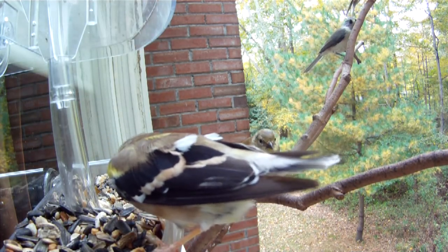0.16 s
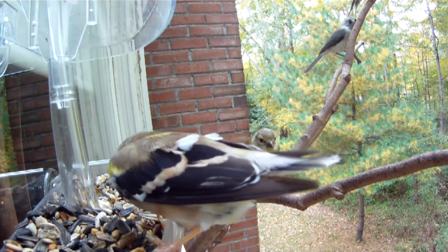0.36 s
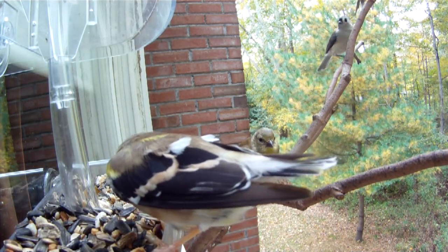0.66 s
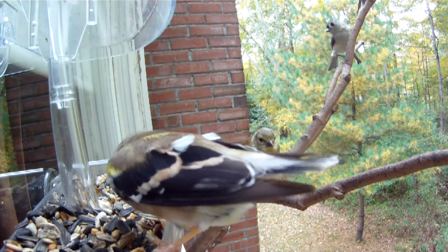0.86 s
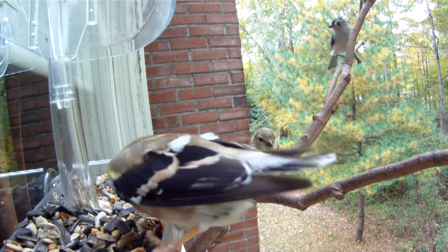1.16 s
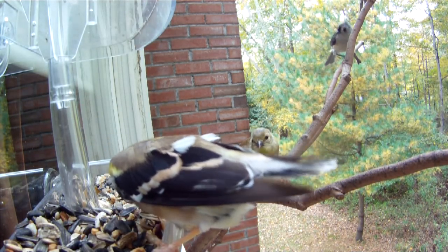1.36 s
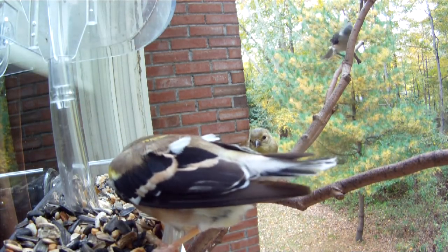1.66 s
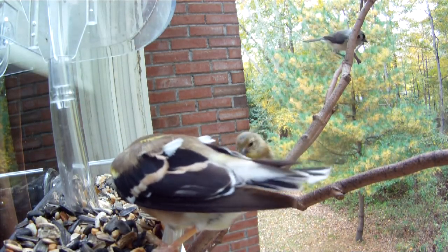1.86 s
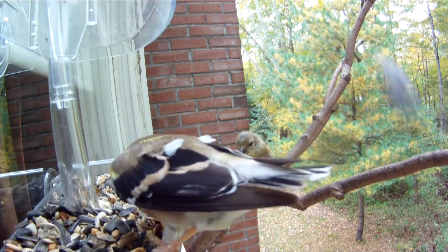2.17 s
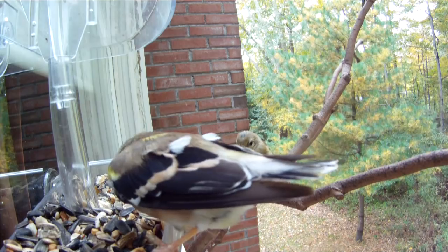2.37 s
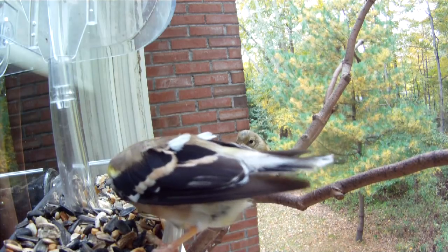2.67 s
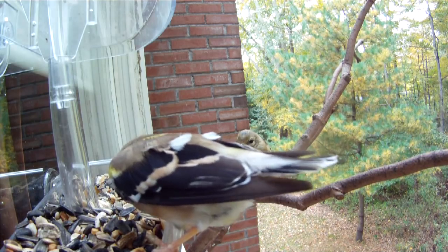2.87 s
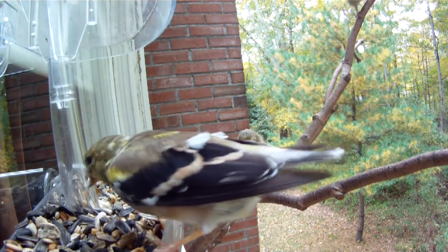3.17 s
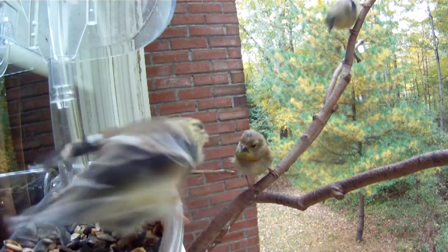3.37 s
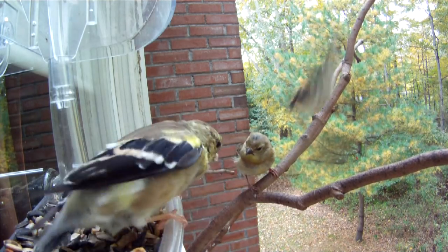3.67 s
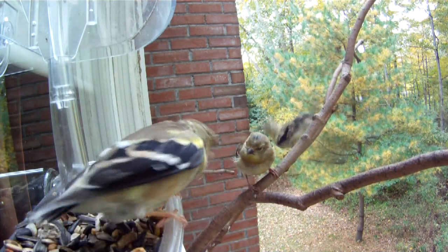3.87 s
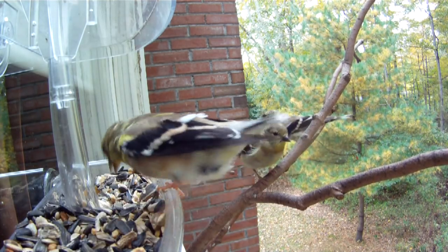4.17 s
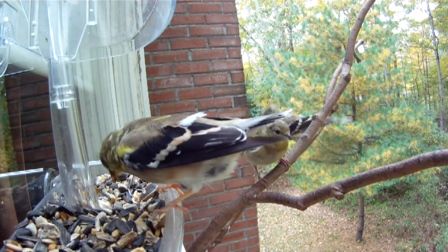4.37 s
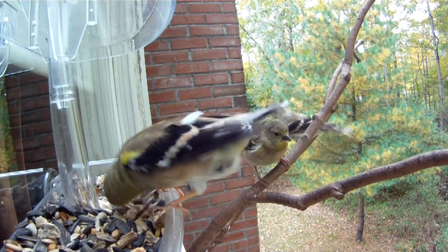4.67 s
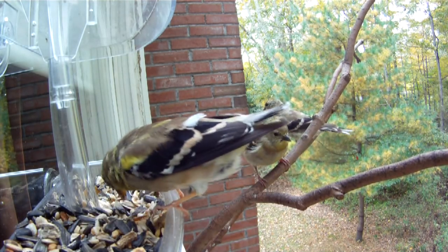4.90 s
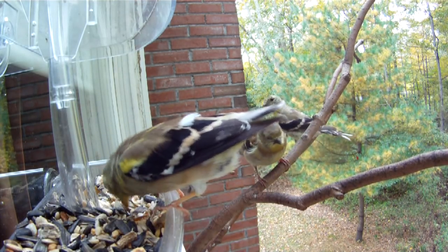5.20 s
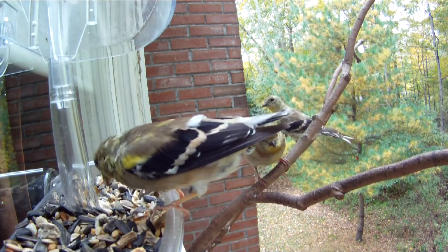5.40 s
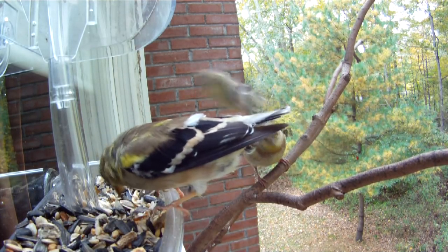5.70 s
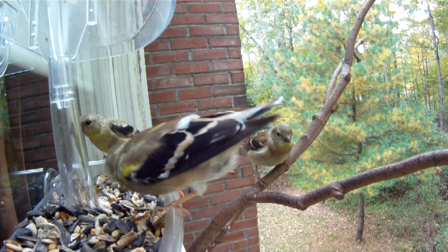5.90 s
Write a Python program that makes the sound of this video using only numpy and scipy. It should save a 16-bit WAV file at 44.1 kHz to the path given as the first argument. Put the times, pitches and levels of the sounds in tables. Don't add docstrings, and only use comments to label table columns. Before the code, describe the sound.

Small songbirds at a plastic seed feeder: soft wing thumps, brief chirps, seed clicks, two sharp tray knocks and a soft landing over constant hiss.

```python
import sys
import numpy as np
from scipy import signal
from scipy.io import wavfile
from scipy.ndimage import uniform_filter1d

SR = 44100
rng = np.random.default_rng(int(sys.argv[2]) if len(sys.argv) > 2 else 0)


def to_linear_factor(level_db):
    exponent = np.asarray(level_db, float) / 20
    return 10 ** exponent


def log_audio(samples):
    frames = np.atleast_2d(samples).T
    limited = np.clip(frames, -1, 1)
    pcm = np.round(limited * 32767).astype(np.int16)
    wavfile.write(sys.argv[1], SR, pcm)


N = 266496


def evened(x):
    return x / np.sqrt(np.mean(x ** 2) + 1e-20)


def peaked(x, db):
    return to_linear_factor(db) * x / abs(x).max()


def add(mix, s, sound):
    part = mix[round(s * SR):][:len(sound)]
    part += sound[:len(part)]


def ring(x, hz, width_hz):
    r = np.exp(-np.pi * width_hz / SR)
    return signal.lfilter([1, 0, -1], [1, -2 * r * np.cos(2 * np.pi * hz / SR), r * r], x)


# f/Hz, density/dB
HISS_SPECTRUM = [(16, -36), (39, -6.5), (69, -2.5), (104, -6.5), (148, -5), (245, -9), (435, -12.5),
                 (735, -15), (1050, -16.5), (1180, -21), (2600, -23), (5050, -26), (5600, -30.5),
                 (6050, -37.5), (7000, -74)]
# t/s, level/dB
STIR = [
    (0.0, -55),
    (1.85, -54),
    (2.35, -52),
    (5.15, -53),
    (5.55, -53),
    (6.04, -52),
]


def hiss(level_db=-47.5, rumble_hz=(95, 210), rustle_hz=500, patchy_db=0.55):
    rumble_share, rustle_share = .45, .95
    frames, hz = N // 1024 + 6, np.fft.rfftfreq(4096, 1 / SR)
    real, imag, patches = rng.standard_normal((frames, len(hz), 3)).T
    f_hz, density_db = np.transpose(HISS_SPECTRUM)
    spectra = (real + 1j * imag) * to_linear_factor(np.interp(np.log(hz + 1), np.log(f_hz + 1), density_db))[:, None]
    patches = uniform_filter1d(uniform_filter1d(patches, size=40, axis=0), size=4, axis=1)
    spectra *= to_linear_factor(patchy_db * evened(patches))
    x = to_linear_factor(level_db) * evened(signal.istft(spectra, nperseg=4096, noverlap=3072)[1][:N])
    rumble = signal.sosfiltfilt(signal.butter(2, rumble_hz, "band", fs=SR, output="sos"), x)
    rustle = signal.sosfiltfilt(signal.butter(2, rustle_hz, "high", fs=SR, output="sos"), x)
    s, db = np.transpose(STIR)
    stir_db = np.interp(np.arange(N) / SR, s, db - np.mean(db))
    return x + (to_linear_factor(rumble_share * stir_db) - 1) * rumble + (to_linear_factor(rustle_share * stir_db) - 1) * rustle


def tick(s, db, hz, width_hz, scrape_ms=1.1, scrape=.09):
    t = np.arange(600) / SR
    drive = scrape * rng.standard_normal(600) * np.exp(-1000 * t / scrape_ms)
    drive[0] -= 1
    dull = signal.butter(2, hz + 1.1 * width_hz, fs=SR)
    return s - 3e-4, peaked(signal.lfilter(*dull, ring(drive, hz, width_hz)), db + 5.0)


def chatter(s, db, hz, side_db, gap_s=.0022):
    return [(s - gap_s, db + side_db, 1.1 * hz), (s, db, hz), (s + gap_s, db + side_db, 1.12 * hz)]


# t/s, level/dB, f/Hz
BEAK_TICKS = [(.0167, -38, 4600), (3.3813, -44, 5300), (3.4339, -36, 4640), (3.6997, -44, 5100),
              (4.702, -44, 4500), (4.7325, -39.5, 5250), (5.0016, -40, 4900), (3.6697, -44, 4800),
              (3.7053, -47, 4800), (5.796, -45, 5500), (5.811, -42, 5500), (6.0163, -44, 4300)]
# t/s, level/dB, f/Hz, outer contacts/dB
HUSK = (3.3932, -36, 5100, -2.5)


def beaks(near, width_hz=950):
    for s, db, hz in BEAK_TICKS + chatter(*HUSK):
        add(near, *tick(s, db, hz, width_hz))


def whistle(hz, db, waver=.002, flutter_db=.4):
    wobble = [evened(uniform_filter1d(v, size=90)) for v in rng.standard_normal((2, len(hz)))]
    glide = uniform_filter1d(hz, size=120, mode="nearest") * (1 + waver * wobble[0])
    level = to_linear_factor(db + flutter_db * wobble[1]) * signal.windows.tukey(len(hz), .09)
    return np.sqrt(2) * level * np.sin(2 * np.pi * np.cumsum(glide) / SR)


def chirp(start, length, hz, db, hold):
    creep_hz_per_s, sag_hz_per_s, fade_db_per_s, climax = 3200, 19500, 400, .43
    t = np.arange(0, length, 1 / SR)
    pitch = hz + creep_hz_per_s * np.minimum(t, hold) - sag_hz_per_s * np.maximum(t - hold, 0)
    return start, whistle(pitch, db - fade_db_per_s * abs(t - climax * length))


# t/s, length/s, f/Hz, level/dB, hold/s
CALLS = [
    (1.7505, .0175, 2800, -48, .007),
    (2.4765, .027, 3350, -36, 0),
    (2.505, .006, 2850, -51, 0),
    (3.9745, .0398, 3105, -39.5, .0198),
]


def calls(near):
    for row in CALLS:
        add(near, *chirp(*row))


def scuff(start, end, db, hz, width_hz, per_s=1800, spread_db=3.5):
    chance, size, sign = rng.random((round((end - start) * SR), 3)).T
    grains = (chance < per_s / SR) * to_linear_factor(-spread_db * np.log(size + 0.011)) * np.sign(sign - .5)
    return start, to_linear_factor(db) * evened(ring(grains, hz, width_hz)) * signal.windows.tukey(len(grains), .4)


SCUFFS = [
    (2.15, 2.8, -52, 150, 90),
    (2.36, 2.396, -54.5, 3800, 3000),
    (3.378, 3.43, -54, 3200, 3000),
    (3.662, 3.707, -58, 3000, 2500),
    (4.695, 4.755, -63, 3200, 3000),
    (5.001, 5.009, -45, 3400, 2000),
    (4.698, 4.706, -47, 4600, 1200),
    (6.012, 6.03, -55, 3500, 3500),
    (5.95, 6.003, -58, 1300, 1200),
    (6.009, 6.043, -50, 900, 1300),
]


def scuffs(tray):
    for row in SCUFFS:
        add(tray, *scuff(*row))


def stroke(s, db, build_ms, release_ms):
    ms = np.arange(-2600, 1000) * 1000 / SR
    return s - 2600 / SR, to_linear_factor(db) * np.where(ms < 0, np.exp(ms / build_ms), np.exp(-(ms / release_ms) ** 2))


def sway(s, db, direction, half_ms):
    ms = np.arange(-900, 900) * 1000 / SR
    return s - 900 / SR, direction * to_linear_factor(db) * np.exp(-abs(ms / half_ms) ** 4)


# t/s, downstroke/dB, rebound/dB
WINGBEATS = [
    (2.205, -36, -44),
    (2.246, -28, -28),
    (2.300, -23.5, -28),
    (2.351, -28.5, -46),
    (5.635, -35, -39),
    (5.758, -35, -50),
]


def wings():
    rebound_s, rebound_ms, suck_s = .014, 2.8, .009
    air = np.zeros(N)
    for s, db, rebound_db in WINGBEATS:
        add(air, *stroke(s, db, build_ms=10, release_ms=1.9))
        add(air, *stroke(s + rebound_s, rebound_db, rebound_ms, rebound_ms))
        add(air, *sway(s + rebound_s + suck_s, rebound_db - 6, direction=-1, half_ms=4.5))
    return signal.lfilter(*signal.butter(1, 11, "high", fs=SR), air)


def drone(start, end, hz, db, waver=0.023, swell_db=2.7):
    t = np.arange(start, end, 1 / SR)
    drift, swell = (evened(uniform_filter1d(v, size=3000)) for v in rng.standard_normal((len(t), 2)).T)
    tone = np.sin(2 * np.pi * np.cumsum(hz * (1 + waver * drift)) / SR)
    return start, np.sqrt(2) * to_linear_factor(db + swell_db * swell) * tone * signal.windows.tukey(len(t), .4)


# from t/s, to t/s, f/Hz, level/dB
PERCH = [
    (2.3, 2.975, 160, -57.5),
    (2.45, 2.95, 113.1, -56),
]


def perch(air):
    for row in PERCH:
        add(air, *drone(*row))


# t/s, level/dB, f/Hz
SEEDS = [(2.3702, -38, 2770), (2.379, -44, 3850), (2.3889, -43, 4440), (3.3546, -46, 1700),
         (3.391, -40, 2300), (3.4164, -33, 2600), (3.4341, -34, 3900), (3.4553, -43, 2520),
         (3.6759, -43, 2970), (3.6826, -40, 2600), (3.6997, -39, 3300), (3.7318, -43, 3830),
         (3.8089, -41, 2810), (3.8234, -35, 2900), (3.844, -42, 4300), (3.9487, -45, 2280),
         (4.1856, -45, 4510), (4.7202, -43, 2030), (4.7479, -45, 2520), (5.0015, -30, 3100),
         (5.0042, -38, 3750), (5.7961, -45, 4790), (5.8111, -40, 2440)]
# t/s, level/dB, f/Hz, outer contacts/dB
RATTLES = [
    (3.6693, -30, 2200, -12),
    (3.6882, -33, 2700, -5),
    (3.7076, -36, 2400, -4),
    (4.7336, -41, 2800, -5),
]


def seeds(tray, width_ratio=.55):
    for s, db, hz in SEEDS + [row for rattle in RATTLES for row in chatter(*rattle)]:
        add(tray, *tick(s, db, hz, width_ratio * hz))


# t/s, effort/dB
BREATH = [
    (2.627, -14),
    (2.642, -12),
    (2.653, -1.2),
    (2.657, .1),
    (2.664, -2.2),
    (2.670, -10),
    (2.681, -15),
]


def voice(start, length, hz, fall_hz, bend, db, cracks):
    break_s, break_hz, break_db, break_ms = 2.6505, 180, -11, 2.6
    t = np.arange(0, length, 1 / SR)
    x = 1000 * (start + t - break_s) / break_ms
    pitch = hz - fall_hz * (t / length) ** bend - cracks * break_hz * (1 + np.tanh(x)) / 2
    effort_db = np.interp(start + t, *np.transpose(BREATH))
    return start, whistle(pitch, db + effort_db + cracks * break_db * np.exp(-x ** 2))


# t/s, length/s, f/Hz, fall/Hz, bend, level/dB
UPPER = (2.6265, .05, 4270, 1280, 1.6, -35.5)
LOWER = (2.629, .051, 3170, 860, 1.02, -38.5)


def duet(near):
    add(near, *voice(*UPPER, cracks=0))
    add(near, *voice(*LOWER, cracks=1))


# f/Hz, level/dB, t60/s
TRAY_MODES = [(740, -3.5, 0.0099), (1103, 6.3, 0.01), (1770, 1, 0.0055), (2570, -9.5, 0.0063),
              (3300, -6, .007), (4300, -5.5, 0.011)]


def knock(s, db, pitch, bright_db, contact_ms=.09, rattle=.07):
    t, lead_s = np.arange(1200) / SR, .0015
    ms = 1000 * (t - lead_s)
    blow = rattle * rng.standard_normal(1200) * np.exp(-abs(ms) / 1.2) - np.exp(-(ms / contact_ms) ** 2)
    blow += 0.18 * np.exp(-((ms + 0.24) / (1.2 * contact_ms)) ** 2)
    modes = 0
    for hz, mode_db, t60 in TRAY_MODES:
        level = to_linear_factor(mode_db - 60 * t / t60 + bright_db * np.log2(hz / 1000))
        modes = modes + level * np.cos(2 * np.pi * hz * pitch * t)
    return s - lead_s, peaked(np.convolve(blow, modes)[:1200], db)


# t/s, level/dB, pitch factor, brightness/(dB/octave)
KNOCKS = [(3.3815, -33, 0.58, -4), (3.4166, -36, 0.98, 2.5), (3.6692, -30, 1.05, 6), (6.0162, -34, 0.5, -8),
          (6.0215, -29.5, 0.62, -12), (3.4359, -14.5, 1.1, 4), (3.8277, -8.3, 1.016, 5.5),
          (3.9996, -30, 0.91, .1), (4.733, -35, 0.87, -2), (5.001, -35, 1.13, 8), (5.961, -38, 0.94, -3),
          (6.018, -29, 1.02, -11)]


def claws(tray):
    for row in KNOCKS:
        add(tray, *knock(*row))


# t/s, level/dB, direction (sign), half length/ms
LANDING = [
    (6.0137, -27, 1, 2.9),
    (6.0205, -33, 1, 2.1),
    (6.027, -20.5, -1, 3.9),
    (6.041, -28.5, 1, 10.5),
]


def landing(air):
    for row in LANDING:
        add(air, *sway(*row))


def echo(x, t60_s=0.068, level_db=-18):
    t = np.arange(1300) / SR
    tail = rng.standard_normal(1300) * to_linear_factor(-60 * t / t60_s) * (t > .002)
    return to_linear_factor(level_db) * signal.oaconvolve(x, tail / np.linalg.norm(tail))[:N]


def scene():
    floor = hiss()
    near, tray = np.zeros((2, N))
    beaks(near)
    scuffs(tray)
    seeds(tray)
    claws(tray)
    near += signal.sosfiltfilt(signal.butter(5, 5300, fs=SR, output="sos"), tray)
    near += echo(near)
    calls(near)
    duet(near)
    air = wings()
    perch(air)
    landing(air)
    return (near + air + floor)[None]


def low_pass(x):
    return signal.sosfilt(signal.butter(12, 15400, fs=SR, output="sos"), x)


def record(dry):
    up, down, count = 40, 147, 4
    slow = signal.resample_poly(dry, up, down, axis=1)
    held = np.repeat(slow, count, axis=1)
    x = signal.resample_poly(held, down, up * count, axis=1)[:, :N]
    lowpass = signal.firwin(301, 15350, window=("kaiser", 7), fs=SR)
    below = signal.oaconvolve(x, lowpass[None], "same")
    mix = below + to_linear_factor(-15) * (x - below)
    return low_pass(mix)


dry = scene()
out = record(dry)
log_audio(out)
```